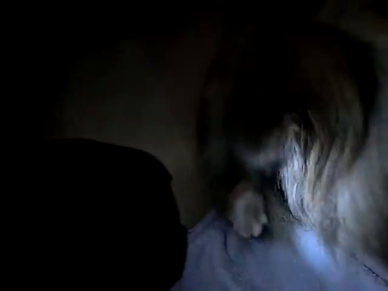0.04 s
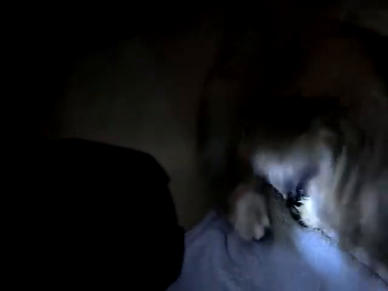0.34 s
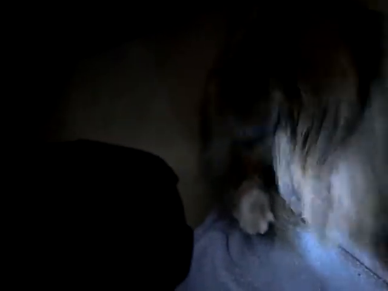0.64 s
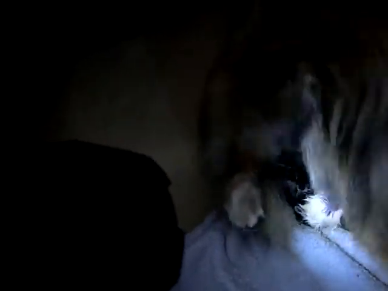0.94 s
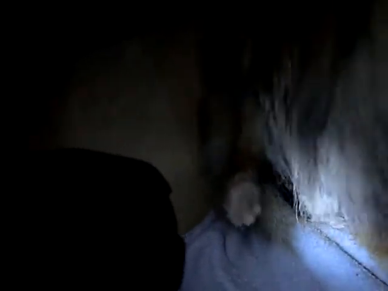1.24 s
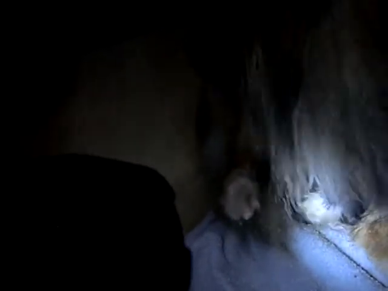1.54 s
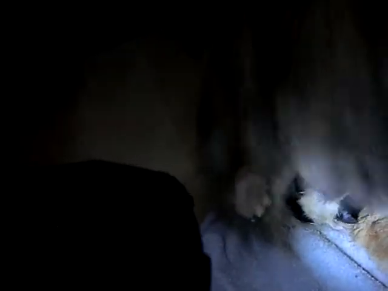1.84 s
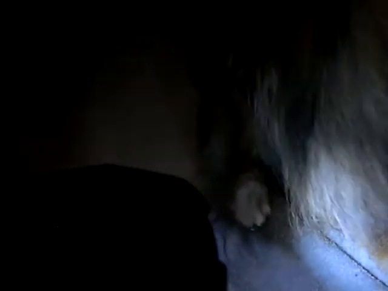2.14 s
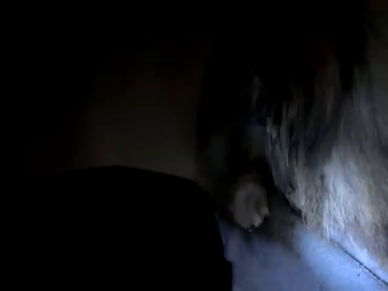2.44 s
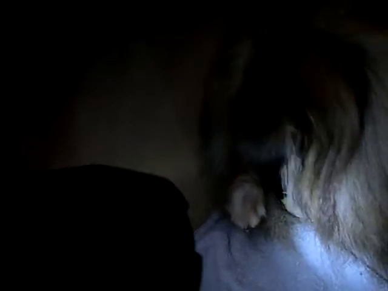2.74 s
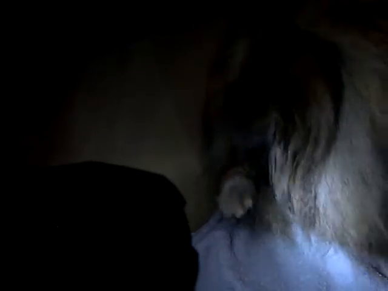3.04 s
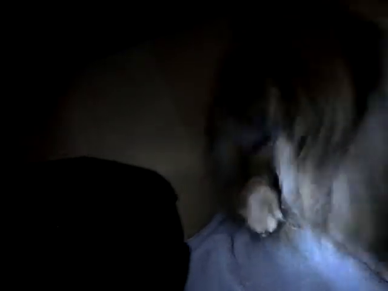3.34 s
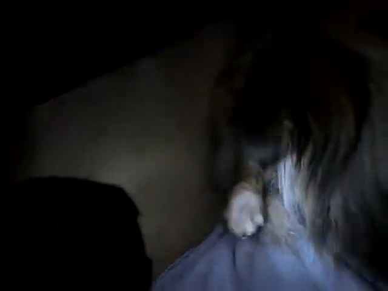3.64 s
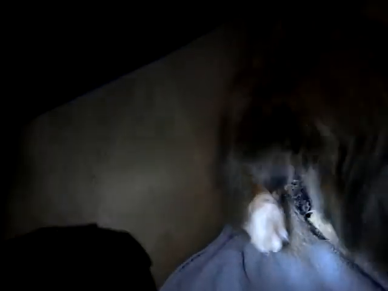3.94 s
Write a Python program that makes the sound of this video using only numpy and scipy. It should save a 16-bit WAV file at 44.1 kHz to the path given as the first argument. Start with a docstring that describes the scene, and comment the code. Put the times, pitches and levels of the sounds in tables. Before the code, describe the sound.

A mother dog licks her newborn puppy close by, with soft tongue strokes, wet ticks and dull mouth smacks. Near the end the puppy gives one high squeak. The room is quiet, with a faint hum.

```python
"""Wet licking, close by: a mother dog grooms her newborn puppy in a quiet room with a low mains hum.
Her tongue rasps through wet fur in swells of tiny clicks, saliva films snap and ring,
and her mouth closes with soft, dull smacks that sound its cavity.
Near the end the puppy gives one high squeak, a harmonic tone that rises and falls."""
import sys
import numpy as np
from scipy import signal
from scipy.fft import rfft, irfft
from scipy.io import wavfile

SR = 44100
rng = np.random.default_rng(int(sys.argv[2]) if len(sys.argv) > 2 else 0)


def to_wav(sig):
    """Store sig (one row per channel, or 1-D mono) as 16-bit WAV at the path in sys.argv[1].

    Samples outside -1..1 are clipped; the rate is SR.
    """
    pcm = np.clip(np.atleast_2d(sig), -1, 1) * 32767
    pcm = np.round(pcm).astype(np.int16)
    wavfile.write(sys.argv[1], SR, pcm.T)  # frames by channels


N = 176400
T = np.arange(N) / SR
HZ = np.maximum(np.fft.rfftfreq(N, 1 / SR), 1)
CUTOFF_HZ = 15750

# room noise spectrum: freq_hz, gain_db
AIR_SPECTRUM = [(20, -1.5), (70, -3.5), (125, -5.5), (200, -10), (350, -8.5), (600, -7.5), (900, -7),
                (1300, -10.5), (2500, -14.5), (5000, -16), (7500, -16.5), (10000, -12.5), (12000, -15.5),
                (13600, -12), (15200, -20), (16000, -32)]
# room noise, left against right: freq_hz, correlation
AIR_CORRELATION = [(30, 0.1), (100, 0.75), (300, 0.37), (900, 0.72), (2000, 0), (5000, 0), (10000, -.25),
                   (15000, -.3)]
# mains hum and faint motor tones: freq_hz, level_db
HUM_TONES = [(50, -73.5), (75, -79), (100, -65), (200, -83), (825, -78), (905, -78), (998, -79.5)]
# squeak contour: time_s, pitch_hz
SQUEAK_CONTOUR = [(3.53, 1200), (3.548, 1506), (3.566, 1830), (3.578, 1927), (3.596, 2347), (3.61, 2520),
                  (3.629, 2576), (3.638, 2407), (3.646, 2125), (3.662, 2018), (3.684, 1743), (3.696, 1950),
                  (3.706, 1810)]
# squeak fundamental: time_s, level_db
FUNDAMENTAL_ENVELOPE = [(3.529, -57), (3.542, -43), (3.566, -35), (3.578, -32.5), (3.598, -25), (3.63, -29),
                        (3.637, -43), (3.65, -51), (3.674, -56), (3.684, -64), (3.698, -46), (3.708, -57)]
# squeak octave: time_s, level_db
OCTAVE_ENVELOPE = [(3.529, -60), (3.568, -55), (3.57, -32.5), (3.577, -28.5), (3.585, -25), (3.594, -49),
                   (3.615, -63.5), (3.637, -59), (3.65, -37.5), (3.664, -37.5), (3.682, -51), (3.697, -45),
                   (3.708, -63)]
# harmonics above the octave, relative to the voice: freq_hz, gain_db
OVERTONE_SPECTRUM = [(4000, -36), (5500, -39), (7800, -28), (10000, -27), (12500, -30), (14300, -19),
                     (16000, -27)]
# voice rasp: time_s, level_db
RASP_ENVELOPE = [(3.528, -66), (3.565, -55), (3.574, -42.5), (3.62, -46.5), (3.66, -56.5), (3.695, -57),
                 (3.712, -61)]
# voice rasp: freq_hz, gain_db
RASP_SPECTRUM = [(600, -9.5), (1200, -19), (2300, 8), (3100, -3), (4200, 3), (5500, -11), (9000, -1.5),
                 (12000, -3), (14600, 2), (16000, -20)]
# voice breaks at both ends of the squeak: start_s, length_s, start_hz, end_hz, level_db
BREAK_CHIRPS = [(3.534, 0.0096, 2200, 1790, -48), (3.545, 0.017, 1400, 1080, -48),
                (3.687, 0.0082, 3070, 2320, -38), (3.711, 0.019, 780, 520, -43.5)]
# saliva ticks: start_s, level_db, ring_hz
SALIVA_TICKS = [(0.085, -41.5, 6800), (.114, -44, 6000), (.181, -51, 3900), (.1915, -42, 10000),
                (.3925, -43, 5500), (.487, -44.5, 2750), (.566, -41, 3920), (.644, -42, 11000),
                (0.667, -46, 8700), (.6725, -41, 3340), (0.748, -44, 4720), (0.7822, -36, 6650),
                (1.0055, -42, 9900), (1.0235, -33, 9900), (1.0473, -43, 5440), (1.073, -38, 12200),
                (1.115, -48, 3360), (1.1246, -41, 8200), (1.156, -43, 9500), (1.1927, -30.5, 12400),
                (1.2404, -37.5, 7950), (1.249, -46, 2900), (1.258, -36, 7540), (1.3035, -54, 3320),
                (1.3121, -39, 2400), (1.4945, -36.5, 2320), (1.4967, -39, 4200), (1.559, -39, 9000),
                (1.699, -45, 5400), (1.7386, -33.5, 4600), (1.7699, -38, 12000), (1.8246, -43.5, 2440),
                (1.824, -34.5, 9900), (1.8467, -34.5, 7760), (1.851, -44, 5230), (1.856, -42, 13000),
                (1.8685, -40.5, 2540), (1.8706, -34, 5300), (1.8995, -44.5, 2050), (1.9, -39.5, 5800),
                (2.11, -42.5, 5000), (2.333, -35.5, 12200), (2.4502, -49, 3180), (2.4882, -40, 8850),
                (2.7717, -39, 12000), (2.78, -38, 9000), (2.832, -33.5, 5700), (2.842, -31, 10100),
                (2.887, -36, 12400), (2.9816, -28.5, 8750), (3.2666, -33, 11200), (3.4219, -36, 5670),
                (3.426, -43.5, 1860), (3.432, -37.5, 8500), (3.5315, -40, 1480), (3.713, -38, 2100),
                (3.882, -32.5, 7760), (3.8915, -33.5, 3780), (3.8917, -28.5, 8600)]
# mouth smacks: start_s, level_db, squelch_decay_s, pitch_ratio, hardness_ratio
MOUTH_SMACKS = [(.1385, -40, 0.0056, 0.82, 0.64), (.1465, -38, 0.023, 1.16, 0.63),
                (.708, -43, 0.03, 1.03, 1.4), (1.3025, -35, 0.0051, 0.99, 1.7),
                (1.3064, -34, 0.0044, 0.97, 1.16), (1.3119, -34.5, 0.0042, .97, 1.9),
                (1.495, -46.5, 0.013, 0.82, 1.5), (1.731, -47, 0.0066, 0.55, 0.71),
                (2.051, -39.5, 0.0026, 1.27, 0.51), (2.159, -48.5, 0.0087, 0.74, 0.7),
                (2.6897, -41, 0.0089, 0.86, 0.64), (2.696, -36.5, 0.013, 1.21, 0.44),
                (2.7205, -35, 0.0022, 0.92, 0.25), (2.858, -45, 0.0044, 1.27, 0.77),
                (3.0905, -36, 0.0009, 1.28, .45), (3.091, -41, 0.0031, 0.54, 0.26)]
# mouth cavity resonances: freq_hz, gain_db, t60_s
MOUTH_MODES = [(169, -18.5, 0.047), (343, -18.5, .013), (580, -8.5, 0.024), (690, -15.5, 0.02),
               (1220, -9.5, 0.014), (2240, -5, 0.0071)]
# tongue strokes: peak_s, swell_s, fade_s, level_db, tilt_db_per_octave
TONGUE_STROKES = [(.10, 0.023, 0.11, -54.5, 2), (.44, 0.079, 0.041, -57, -1.5),
                  (.57, 0.057, 0.038, -55.5, 3.5), (.675, 0.023, 0.017, -49.5, 3.5),
                  (.74, 0.028, 0.042, -56, 2), (1.0, 0.073, 0.067, -57.5, -1),
                  (1.12, 0.036, 0.088, -56.5, 1.5), (1.26, 0.019, 0.09, -53.5, 2),
                  (1.485, 0.054, 0.042, -52.5, -2), (1.71, 0.089, 0.015, -58.5, 5),
                  (1.85, 0.062, 0.056, -56.5, 1.5), (1.99, 0.032, .04, -53, 4),
                  (2.125, 0.019, 0.054, -55.5, 3), (2.35, 0.071, 0.034, -57.5, 4),
                  (2.48, 0.11, 0.033, -57.5, -2), (2.67, .05, .04, -54.5, 2.5), (2.85, 0.018, .03, -55, 1),
                  (3.0, 0.041, 0.03, -55, 4.5), (3.28, .025, 0.043, -56, 2.5),
                  (3.428, 0.01, .02, -58, -1.5), (3.715, 0.011, 0.015, -50.5, 0),
                  (3.886, 0.048, 0.043, -50, -1.5)]
# wet fur under the tongue: freq_hz, gain_db
FUR_SPECTRUM = [(150, -6), (400, -1), (750, 8), (1300, -3), (2600, 3.5), (4500, 1.5), (7000, 0),
                (10000, -1), (15500, -5)]


def from_db(db):
    """Decibels to gain."""
    return 10 ** (np.asarray(db) / 20)


def unit_rms(x):
    """Scale to unit power."""
    return x / np.sqrt(np.mean(x ** 2) + 1e-20)


def at_hz(table):
    """Table interpolated over log frequency at every FFT bin."""
    hz, value = np.transpose(table)
    return np.interp(np.log(HZ), np.log(hz), value)


def colour(x, spectrum, tilt_db_per_octave=0):
    """Apply a spectrum, tilted above 500 Hz; unit power."""
    gain_db = at_hz(spectrum) + tilt_db_per_octave * np.log2(np.maximum(HZ, 500) / 3000)
    return unit_rms(irfft(rfft(x) * from_db(gain_db), N))


def lowpass(x, hz):
    """Second-order treble roll-off."""
    return signal.sosfilt(signal.butter(2, min(hz, .45 * SR), fs=SR, output="sos"), x + 1e-18)


def envelope(table):
    """Gain over time; silent outside the table."""
    return from_db(np.interp(T, *np.transpose(table), left=-np.inf, right=-np.inf))


def flutter(depth_db):
    """Quick random wavering of level."""
    return from_db(depth_db * unit_rms(lowpass(rng.standard_normal(N), hz=88.4)))


def pan(left_minus_right_db):
    """Left and right gains."""
    return from_db(np.array([[1], [-1]]) * left_minus_right_db / 2)


def place(x, pan_db, lag_s):
    """A source on the right reaches the left side later and softer."""
    left, right = x * pan(pan_db)
    return np.array([irfft(rfft(left) * np.exp(-2j * np.pi * HZ * lag_s), N), right])


def widen(pair, correlation):
    """Two independent signals to partly correlated stereo."""
    mid, side = pair
    return np.sqrt(1 + correlation) * mid + np.sqrt(1 - correlation) * side * np.array([[1], [-1]])


def add(out, start_s, sound):
    """Mix in a short sound."""
    i = int(start_s * SR)
    out[i:i + len(sound)] += sound[:N - i]


def background(air_db=-58.5):
    """Steady room noise, mains hum and faint motor tones."""
    air = irfft(widen(rfft(rng.standard_normal((2, N))), at_hz(AIR_CORRELATION)), N)
    hum = sum(np.sqrt(2) * from_db(db) * np.sin(2 * np.pi * (hz * T + rng.random()))
              for hz, db in HUM_TONES)
    return (from_db(air_db) * colour(air, AIR_SPECTRUM) + hum) * pan(-1)


def room_reverb(x, t60_s=0.25, gain_db=-18):
    """Short, faint tail of a softly furnished room."""
    t = T[:SR // 2]
    tail = lowpass(rng.standard_normal((2, len(t))), hz=6900) * np.exp(-np.log(1000) * t / t60_s)
    return from_db(gain_db) * signal.fftconvolve(x, unit_rms(tail) / np.sqrt(len(t)), axes=1)[:, :N]


def puppy_squeak(gain_db=0.5, pan_db=-3, jitter_ratio=0.0069):
    """Gliding voice: strong octave, faint overtones, a little rasp, brief breaks."""
    jitter = jitter_ratio * unit_rms(lowpass(rng.standard_normal(N), hz=500))
    pitch_hz = np.interp(T, *np.transpose(SQUEAK_CONTOUR)) * (1 + jitter)
    phase = 2 * np.pi * np.cumsum(pitch_hz) / SR
    fundamental, octave = envelope(FUNDAMENTAL_ENVELOPE), envelope(OCTAVE_ENVELOPE)
    voice = flutter(depth_db=1.5) * (fundamental * np.sin(phase) + octave * np.sin(2 * phase))
    effort = np.hypot(fundamental, octave)
    overtone_drive = effort.max() * (effort / effort.max()) ** 1.05
    for k in range(3, 9):
        hz = k * pitch_hz
        gain = from_db(np.interp(hz, *np.transpose(OVERTONE_SPECTRUM))) * (hz < CUTOFF_HZ)
        voice += overtone_drive * flutter(depth_db=3.5) * gain * np.sin(k * phase)
    voice *= np.sqrt(2) * from_db(gain_db)
    for start_s, length_s, start_hz, end_hz, level_db in BREAK_CHIRPS:
        glide_hz = np.linspace(start_hz, end_hz, int(length_s * SR))
        chirp = np.sin(2 * np.pi * np.cumsum(glide_hz) / SR)
        add(voice, start_s, from_db(level_db) * signal.windows.tukey(len(chirp), .7) * chirp)
    noise = widen(rng.standard_normal((2, N)), correlation=.15)
    rasp = envelope(RASP_ENVELOPE) * colour(noise, RASP_SPECTRUM)
    return place(voice, pan_db, lag_s=42e-6) + rasp * pan(pan_db)


def film_snap(level_db, ring_hz, ring_q=6.3, upper_db=-8, crack_db=-11, crack_decay_s=0.0027):
    """A saliva film snaps: tiny crack, brief ring, higher the smaller the film."""
    t = T[:SR // 50]
    upper_hz = min(1.59 * ring_hz, 0.85 * CUTOFF_HZ)
    ring = np.sin(2 * np.pi * ring_hz * t) + from_db(upper_db) * np.sin(2 * np.pi * upper_hz * t)
    ring *= np.exp(-np.pi * t * ring_hz / ring_q)
    crack = from_db(crack_db) * rng.standard_normal(len(t)) * np.exp(-t / crack_decay_s)
    highpass = signal.butter(2, 0.82 * ring_hz, "high", fs=SR, output="sos")
    return from_db(level_db) * lowpass(signal.sosfilt(highpass, ring + crack), 2.8 * ring_hz)


def saliva_ticks(gain_db=3.5, crackle_per_s=41, crackle_db=-50.5, spread_db=11.5):
    """Clear film snaps over a faint random crackle of weaker ones."""
    out = np.zeros(N)
    for start_s, level_db, ring_hz in SALIVA_TICKS:
        add(out, start_s, film_snap(level_db, ring_hz))
    low_hz, high_hz, candidates = 2490, 13400, 300
    for when, softness, pitch, chance in rng.random((candidates, 4)):
        snap = film_snap(crackle_db - spread_db * softness, low_hz * (high_hz / low_hz) ** pitch)
        if chance < crackle_per_s * T[-1] / candidates:
            add(out, when * T[-1], snap)
    return from_db(gain_db) * out


def mouth_smacks(gain_db=-0.5, squelch_db=-18.5, top_hz=2020):
    """A soft tongue slap and squelch ring the mouth cavity, sized anew for each smack."""
    out, t = np.zeros(N), T[:SR // 8]
    for start_s, level_db, squelch_decay_s, pitch_ratio, hardness_ratio in MOUTH_SMACKS:
        contact = from_db(squelch_db) * rng.standard_normal(len(t)) * np.exp(-t / squelch_decay_s)
        contact[0] = 1  # the slap
        cavity = sum(from_db(db) * np.cos(2 * np.pi * hz * pitch_ratio * t)
                     * np.exp(-np.log(1000) * t / t60_s) for hz, db, t60_s in MOUTH_MODES)
        smack = lowpass(signal.fftconvolve(contact, cavity), hardness_ratio * top_hz)
        add(out, start_s, from_db(level_db + gain_db) * smack)
    return out


def hair_flicks(rate_per_s=2500, spread_db=4.5):
    """Wet hairs flick off the tongue: tiny uneven clicks, two independent rows."""
    size = from_db(spread_db * np.minimum(rng.exponential(1, (2, N)), 4))
    sign = rng.choice([-1, 1], (2, N))
    return unit_rms(size * sign * (rng.random((2, N)) < rate_per_s / SR))


def tongue_licks(gain_db=-2, hiss_ratio=0.59):
    """Hair flicks and smooth hiss swell and fade with each stroke through the fur."""
    fur = widen(hair_flicks() + hiss_ratio * rng.standard_normal((2, N)), correlation=0.73)
    fur *= flutter(depth_db=1.8)
    out = np.zeros((2, N))
    for peak_s, swell_s, fade_s, level_db, tilt_db_per_octave in TONGUE_STROKES:
        width_s = np.where(T < peak_s, swell_s, fade_s)
        stroke = np.exp(-.7 * ((T - peak_s) / width_s) ** 2)
        out += from_db(level_db + gain_db) * stroke * colour(fur, FUR_SPECTRUM, tilt_db_per_octave)
    return out


def scene(puppy_send_db=-10):
    """Mother and puppy, slightly to the right in the quiet room."""
    mother = place(saliva_ticks() + mouth_smacks() + tongue_licks(), pan_db=-2.1, lag_s=22e-6)
    puppy = puppy_squeak()
    return mother + puppy + room_reverb(mother + from_db(puppy_send_db) * puppy) + background()


def record(dry):
    """Steep treble cut."""
    return signal.sosfilt(signal.ellip(10, .1, 70, CUTOFF_HZ, fs=SR, output="sos"), dry)


dry = scene()
out = record(dry)
to_wav(out)
```